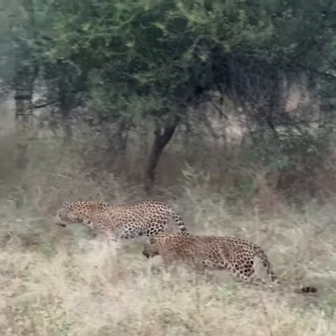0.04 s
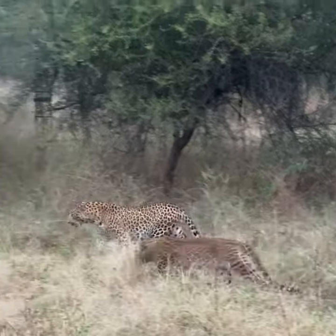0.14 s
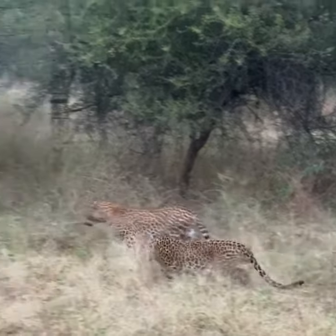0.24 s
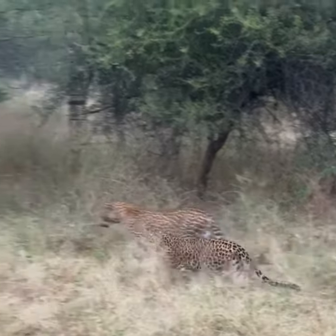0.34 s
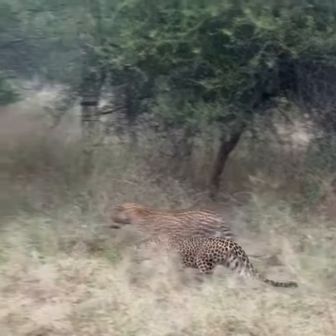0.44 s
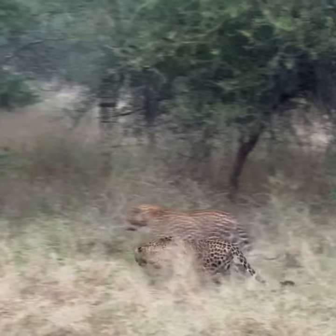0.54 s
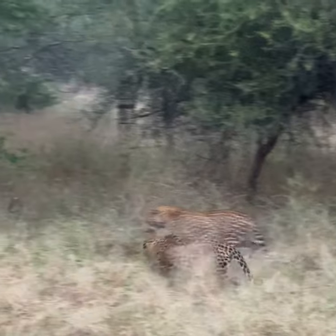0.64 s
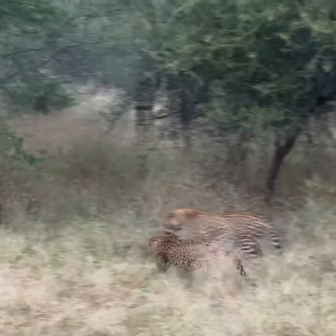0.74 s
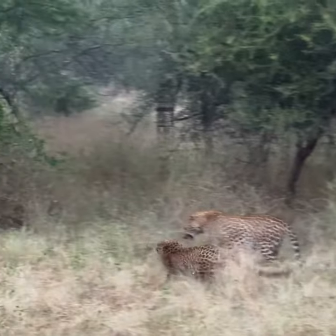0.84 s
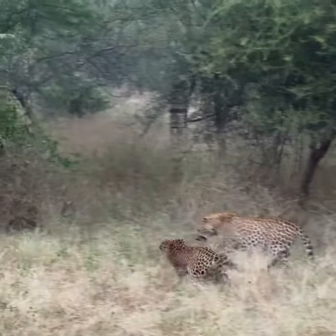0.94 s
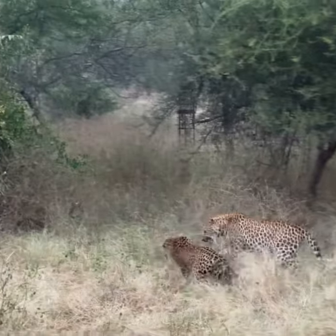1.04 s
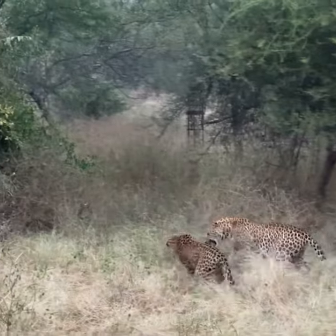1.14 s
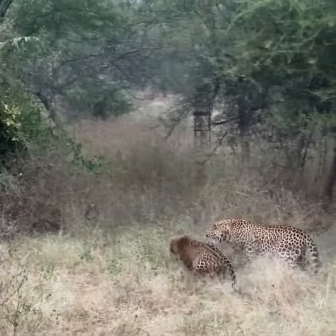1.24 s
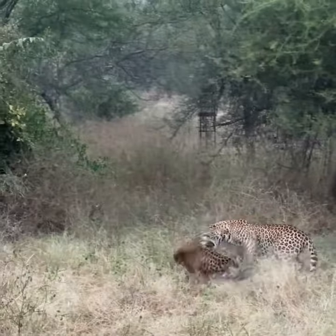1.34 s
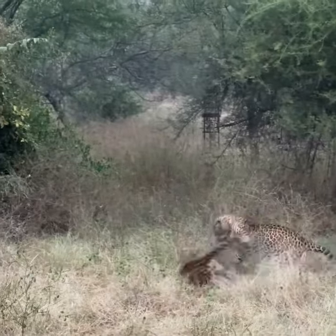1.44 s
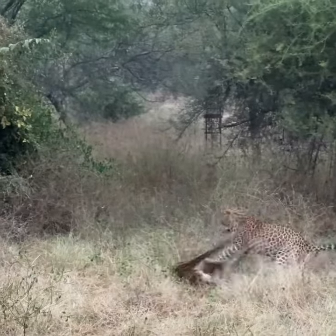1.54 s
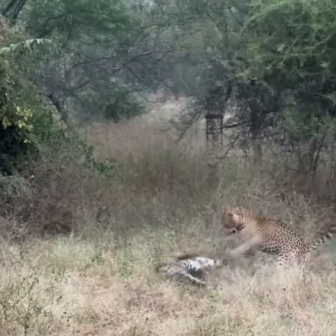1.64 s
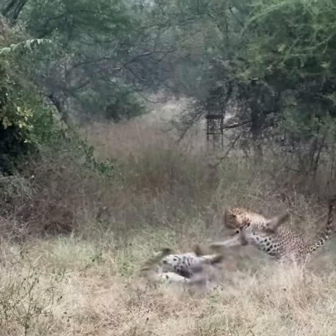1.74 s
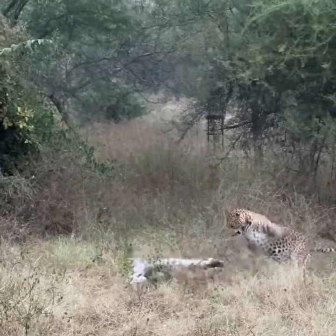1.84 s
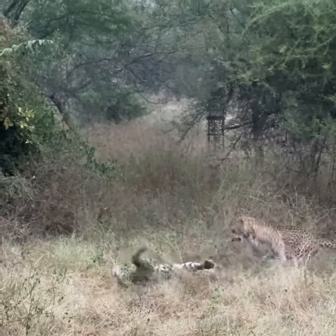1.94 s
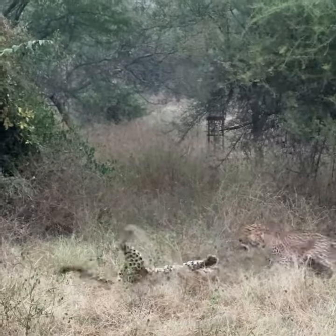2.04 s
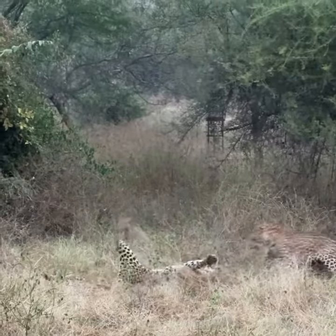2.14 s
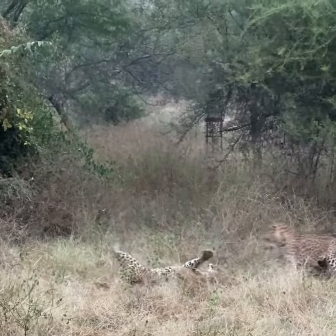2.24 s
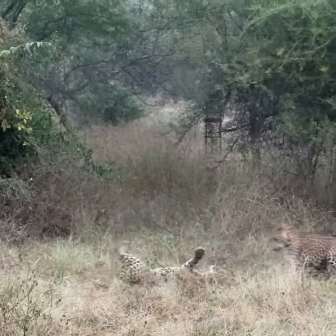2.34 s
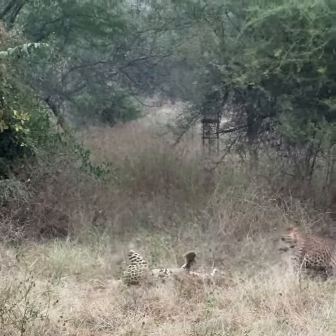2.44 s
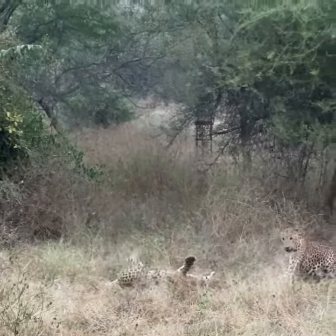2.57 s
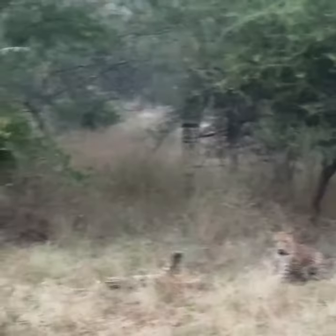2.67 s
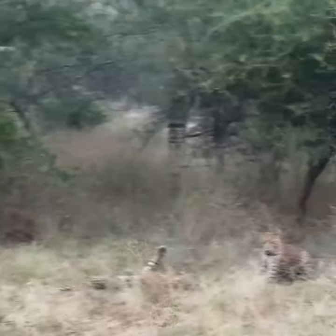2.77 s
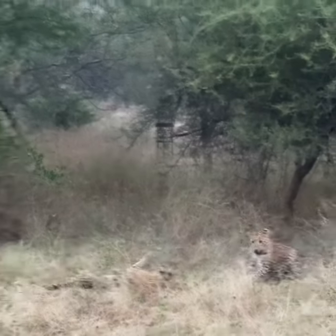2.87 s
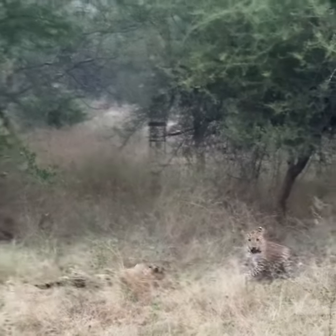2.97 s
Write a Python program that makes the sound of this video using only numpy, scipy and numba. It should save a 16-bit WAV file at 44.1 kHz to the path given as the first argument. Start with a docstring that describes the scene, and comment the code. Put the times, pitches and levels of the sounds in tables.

```python
"""Leopards scuffling in dry grass

Two leopards scuffle some way off; one is heard growling in slow throat flaps that quicken into an
open-mouthed snarl, then sink back into two weaker growls. Each flap pushes the chest resonances and
claps the throat and mouth into ringing, with turbulence on top. Shaped noise makes the breath, the
grass and the still air; clicks make the snaps and twig knocks; swept sines make two bird chirps.
"""
import sys
import numpy as np
from scipy import signal
from scipy.fft import rfft, irfft
from scipy.io import wavfile
from scipy.ndimage import uniform_filter1d
from numba import njit

SR = 44100
rng = np.random.default_rng(int(sys.argv[2]) if len(sys.argv) > 2 else 0)


def wav_record(signal):
    """Record a signal, one row per channel, as 16-bit PCM in the file named by sys.argv[1]."""
    frames = np.transpose(np.atleast_2d(signal))
    bounded = np.clip(frames, -1, 1)
    # unit amplitude maps onto the largest positive 16-bit level
    quanta = np.round(bounded * 32767).astype(np.int16)
    wavfile.write(sys.argv[1], SR, quanta)


N = 132300
TIME = np.arange(N) / SR


def from_db(db):
    """Decibels to gain."""
    return 10 ** (np.asarray(db) / 20)


def in_time(rows):
    """Draw every column of a curve out to one value per sample."""
    s, *columns = np.transpose(rows)
    return [np.interp(TIME, s, column) for column in columns]


def band(x, low_hz, high_hz, order=2):
    """Band-pass."""
    edges = [low_hz, min(high_hz, .45 * SR)]
    return signal.sosfilt(signal.butter(order, edges, "band", fs=SR, output="sos"), x + 1e-18)


def even(x):
    """Hold the slow level at rms 1, leaving single flaps standing."""
    power = uniform_filter1d(uniform_filter1d(x * x, size=2200), size=1500)
    return x / np.sqrt(np.abs(power) + 1e-16)


def clicks(times, gains):
    """One click at each time."""
    out = np.zeros(N)
    at = np.clip(np.asarray(times) * SR, 0, N - 1).astype(int)
    np.add.at(out, at, gains)
    return out


def fade(x, decay_s):
    """Each click becomes an exponentially dying envelope."""
    return signal.lfilter([1], [1, -np.exp(-1 / (decay_s * SR))], x + 1e-18)


@njit
def two_pole(x, r, w):
    """Resonator whose damping and pitch may change at every sample."""
    out, state = np.zeros(len(x)), 0j
    for i in range(len(x)):
        state = state * r[i] * complex(np.cos(w[i]), np.sin(w[i])) + (1 - r[i]) * x[i]
        out[i] = 2 * state.real
    return out


def resonate(x, hz, width_hz, order=1):
    """Resonance with gain 1 on top; at higher orders it swells before it dies."""
    damping = np.exp(-np.pi * np.abs(width_hz) / SR) * np.ones(N)
    turn = 2 * np.pi * hz / SR * np.ones(N)
    for _ in range(order):
        x = two_pole(x + 1e-18, damping, turn)
    return x


def coloured(spectrum, side_db):
    """Stereo noise of a given spectrum, its middle at rms 1."""
    hz, db = np.transpose(spectrum)
    bins_hz = np.arange(N // 2 + 1) * SR / N
    gain = from_db(np.interp(np.log(bins_hz + 1), np.log(hz), db))
    mid, side = irfft(rfft(rng.standard_normal((2, N))) * gain, N)
    return (mid + from_db(side_db) * side * np.array([[1], [-1]])) / mid.std()


# Spectrum of the still air of the bush: (frequency [Hz], relative density [dB per Hz])
AIR_SPECTRUM = [(25, 6), (60, 17), (250, 3), (500, -3.5), (2200, -20), (4000, -22.5), (14000, -63)]
AIR_DB = -51.5


def still_air():
    """Steady noise, strongest in the bass; averaging the channels makes it mono."""
    return from_db(AIR_DB) * coloured(AIR_SPECTRUM, side_db=0).mean(axis=0)


CHIRP_S, CHIRP_FALL_HZ_PER_S = .022, 55000   # bell half length to 1/e; slope on both sides of the top

# Bird chirps: (time of the top [s], top pitch [Hz], peak level [dB])
CHIRPS = [(.009, 6400, -56), (2.946, 5800, -68)]


def bird():
    """Thin whistles that rise to a top and fall again under a bell-shaped envelope."""
    out = np.zeros(N)
    for s, top_hz, db in CHIRPS:
        hz = np.maximum(top_hz - CHIRP_FALL_HZ_PER_S * np.abs(TIME - s), top_hz / 2)
        bell = np.exp(-((TIME - s) / CHIRP_S) ** 2)
        out += from_db(db) * bell * np.sin(2 * np.pi * np.cumsum(hz) / SR)
    return out


SNAP_DECAY_S, KNOCK_WIDTH_HZ = 0.0074, 35

# Dry stalks snap: (time [s], level of the envelope [dB])
SNAPS = [(0.058, -39), (1.799, -44), (1.826, -37), (2.325, -41), (2.348, -43), (2.499, -38.5),
         (2.827, -49.5)]
# Twigs knock: (time [s], pitch [Hz], peak level [dB])
KNOCKS = [(0.886, 3080, -43), (1.284, 4250, -41), (2.056, 3840, -40)]


def stalks():
    """Dry stalks snap as dying bright noise; twigs knock as struck resonances with a short ring."""
    s, db = np.transpose(SNAPS)
    bright = band(rng.standard_normal(N), 2100, 23000, order=1)
    snaps = fade(clicks(s, from_db(db)), SNAP_DECAY_S) * bright
    knocks = sum(resonate(clicks([s], from_db(db)), hz, KNOCK_WIDTH_HZ) for s, hz, db in KNOCKS)
    return snaps + knocks * SR / (2 * np.pi * KNOCK_WIDTH_HZ)   # rings start at their table level


# Bodies brush through the grass: (time [s], half length to 1/e [s], peak level [dB])
SWISHES = [(0.907, 0.062, -53), (2.546, 0.09, -48)]


def swishes():
    """Bodies brushing through grass: soft swells of band-passed noise."""
    level = sum(from_db(db) * np.exp(-((TIME - s) / half_s) ** 2) for s, half_s, db in SWISHES)
    return level * even(band(rng.standard_normal(N), 1450, 3600, order=1))


HISS_DB, HISS_FOLLOWS = -20, 0.66   # the hiss takes this share of the rasp's level in dB
HISS_SIDE_DB = -10   # stereo difference against the middle
TICKS_PER_S, TICK_WIDTH_HZ, TICK_DB = 77, 64, -8.5   # grass blades tick; level against the hiss

# Spectrum of the hiss of breath and grass: (frequency [Hz], relative density [dB per Hz])
HISS_SPECTRUM = [(2500, 6.5), (4200, -10.5), (5600, 2.5), (7000, -0.5), (8500, -1.5), (10600, 7.5),
                 (12300, -13.5), (13600, -11)]


def hiss(puff, throb=0.24, crackle=0.32, grains_per_s=200, grain_s=0.001):
    """Air through the teeth throbs with the flaps, mixed with fine crackle and ringing ticks of grass."""
    grains = fade((rng.random(N) < grains_per_s / SR) * rng.exponential(1, N), grain_s)
    shape = even(1 + throb * even(puff) + crackle * even(grains))
    # each tick is dealt one of 24 pitches
    pitches = np.geomspace(3200, 11000, 24)
    born = (rng.random(N) < TICKS_PER_S / SR) * rng.exponential(1, N)
    dealt = rng.integers(0, len(pitches), N)
    ticks = sum(resonate(born * (dealt == k), hz, TICK_WIDTH_HZ) for k, hz in enumerate(pitches))
    noise = shape * coloured(HISS_SPECTRUM, side_db=HISS_SIDE_DB)
    grass = noise + from_db(TICK_DB) * ticks / ticks.std()
    rasp_db = in_time(VOICE_LEVELS)[-1]
    return from_db(HISS_DB + HISS_FOLLOWS * rasp_db) * grass


JITTER_S, SHIMMER_DB, CLAP_SHIMMER_DB = .0004, 2.5, 3   # random spread of flap times and strengths
# the clap lags fully up to the slow rate and not at all from the fast rate on
CLAP_LAG_S, SLOW_FLAP_HZ, FAST_FLAP_HZ = .0135, 34.33, 46.26
PUFF_DECAY_S = 0.0071

# Flap rate of the vocal folds: (time [s], rate [flaps per s])
FLAP_RATE = [(0.0, 35.8), (0.06, 29.2), (0.3, 26.8), (0.58, 33.1), (0.88, 31.5), (0.98, 25.1), (1.06, 46.2),
             (1.18, 49.7), (1.37, 71.7), (1.56, 37.3), (1.64, 79.0), (1.86, 76.0), (2.0, 42.4),
             (2.07, 61.5), (2.24, 50.9), (2.46, 25.0), (2.53, 36.6), (2.65, 34.1), (2.75, 29.5)]


def folds():
    """Each flap gives a soft push, a sharp clap that comes late in slow flaps, and a puff envelope."""
    rate, = in_time(FLAP_RATE)
    at = np.flatnonzero(np.diff(np.floor(np.cumsum(rate) / SR)))   # one flap per full cycle
    chance = rng.standard_normal((len(at), 4))
    push_s = at / SR + JITTER_S * chance[:, 0]
    slowness = np.clip((FAST_FLAP_HZ - rate[at]) / (FAST_FLAP_HZ - SLOW_FLAP_HZ), 0, 1)
    clap_s = push_s + CLAP_LAG_S * slowness + JITTER_S * chance[:, 3]
    push_db = SHIMMER_DB * chance[:, 1]
    push = clicks(push_s, from_db(push_db))
    clap = clicks(clap_s, from_db(push_db + CLAP_SHIMMER_DB * chance[:, 2]))
    return push, clap, fade(clap, PUFF_DECAY_S)


def roughen(pulses, puff, puffed, steady):
    """Pulses mixed with turbulence, partly in puffs and partly steady."""
    in_puffs = even(puff * rng.standard_normal(N))
    return even(pulses) + puffed * in_puffs + steady * rng.standard_normal(N)


WAVER, WAVER_S = 0.023, .03   # spread as a share of the pitch; time between random points


def waver(hz):
    """Soft tissue never holds a resonance quite still."""
    return hz * (1 + WAVER * np.interp(TIME / WAVER_S, np.arange(N), rng.standard_normal(N)))


# trims added to the level curves
CHEST_DB, PHARYNX_DB, THROAT_DB, MOUTH_DB, RASP_DB, RUMBLE_DB = 0.5, -3, -4.5, -0.5, -1, 1
# resonance widths with the mouth shut, and the extra width at full gape
CHEST_WIDTH_HZ, PHARYNX_WIDTH_HZ, THROAT_WIDTH_HZ, MOUTH_WIDTH_HZ = 165, 127, 48, 38
CHEST_GAPE_HZ, PHARYNX_GAPE_HZ, THROAT_GAPE_HZ, MOUTH_GAPE_HZ = 150, 232, 236, 182
BODY_HZ, BODY_WIDTH_HZ, BODY_DB = 124.7, 75, -7   # a low chest resonance that stays put
RUMBLE_HZ, RUMBLE_WIDTH_HZ = 64.2, 31
# turbulence against the pulses, before gaping adds more
PUSH_PUFFED, PUSH_STEADY, CLAP_PUFFED, CLAP_STEADY, RASP_PUFFED = .25, .2, .45, .12, 1.9

# Voice levels before the trims; the hiss follows the rasp too:
# (time [s], chest [dB], low throat [dB], mouth [dB], rasp [dB])
VOICE_LEVELS = [(0.035, -47, -85, -75, -64), (0.09, -77, -77, -73, -66.5), (0.2, -40, -74, -68, -68),
                (0.45, -35, -57, -67.5, -64), (0.6, -37, -66, -64.5, -59), (0.655, -33, -48, -57.5, -64),
                (0.92, -33, -54.5, -61.5, -59), (1.005, -47, -62.5, -78, -56),
                (1.04, -34.5, -51.5, -55, -54.5), (1.2, -31, -41, -47.5, -48.5),
                (1.3, -31.5, -45.5, -48, -48), (1.38, -23.5, -36.5, -33, -42),
                (1.46, -26.5, -37.5, -36.5, -42.5), (1.52, -36.5, -51.5, -55, -51.5),
                (1.61, -33, -56, -51, -57), (1.64, -27.5, -37.5, -24.5, -46.5),
                (1.685, -25.5, -38, -34, -40.5), (1.715, -33, -45, -44.5, -43.5),
                (1.75, -27, -39, -37.5, -42), (1.84, -25.5, -38.5, -33, -39.5),
                (1.95, -26.5, -49, -40.5, -39.5), (2.0, -29.5, -47, -49, -52), (2.12, -26, -40, -37, -38.5),
                (2.3, -30, -47, -46, -49.5), (2.41, -31, -56.5, -58, -57), (2.455, -49.5, -61, -66, -55.5),
                (2.52, -31, -49, -51.5, -52), (2.68, -28, -45.5, -55.5, -50), (2.82, -50, -78, -84, -77),
                (2.88, -57, -100, -72, -77), (2.98, -42.5, -88, -77, -76)]
# Deep rumble under the growl, before its trim: (time [s], level [dB])
RUMBLE_LEVEL = [(.1, -54.5), (.33, -43), (.9, -36.5), (1.06, -49), (1.2, -50), (1.44, -33), (1.6, -48),
                (2.15, -43), (2.47, -40.5), (2.6, -35), (2.87, -53.5)]
# Resonances as the jaw opens and closes, before they waver:
# (time [s], chest [Hz], throat [Hz], mouth [Hz])
JAW = [(.5, 195, 920, 1360), (.65, 160, 724, 1232), (.95, 144, 770, 1192), (1.08, 137, 898, 1348),
       (1.45, 162, 850, 1347), (1.59, 152, 750, 1230), (1.635, 444, 820, 1240), (1.71, 288, 770, 1410),
       (1.83, 288, 740, 1360), (1.93, 258, 750, 1226), (2.0, 165, 820, 1426), (2.13, 175, 946, 1530),
       (2.42, 150, 840, 1318), (2.52, 164, 750, 1204),]
# Resonance at the back of the throat, before it wavers: (time [s], frequency [Hz])
PHARYNX = [(.95, 358), (1.1, 467), (1.34, 496), (1.39, 344), (1.5, 357), (1.65, 570), (1.86, 620),
           (2.3, 485), (2.55, 335)]
# How wide the mouth gapes: (time [s], gape [share 0-1])
GAPE = [(1.2, 0.11), (1.45, 0.22), (1.58, 0.4), (1.64, 0.9), (1.9, 0.8), (2.02, 0.04), (2.12, 0.63),
        (2.4, 0.02)]
# Upper resonances of the mouth: (frequency [Hz], width [Hz], relative level [dB])
RASP_MODES = [(1940, 480, 14), (2360, 1300, -1.5), (3340, 390, -18.5), (4550, 430, -9.5)]


def growl(push, clap, puff):
    """Pushes swell in the chest, claps ring throat and mouth; gaping widens and changes the turbulence."""
    chest_db, throat_db, mouth_db, rasp_db = in_time(VOICE_LEVELS)
    rumble_db, = in_time(RUMBLE_LEVEL)
    chest_hz, throat_hz, mouth_hz, pharynx_hz = [waver(hz) for hz in in_time(JAW) + in_time(PHARYNX)]
    gape = np.clip(in_time(GAPE)[0], 0, 1)

    drive = roughen(push, puff, puffed=PUSH_PUFFED + 0.51 * gape, steady=PUSH_STEADY + 0.34 * gape)
    chest = even(resonate(drive, chest_hz, CHEST_WIDTH_HZ + CHEST_GAPE_HZ * gape, order=4))
    chest += from_db(BODY_DB) * even(resonate(drive, BODY_HZ, BODY_WIDTH_HZ, order=2))
    rumble = resonate(drive, RUMBLE_HZ, RUMBLE_WIDTH_HZ, order=2)

    drive = roughen(clap, puff, puffed=CLAP_PUFFED + 2.0 * gape, steady=CLAP_STEADY + 0.64 * gape)
    pharynx = resonate(drive, pharynx_hz, PHARYNX_WIDTH_HZ + PHARYNX_GAPE_HZ * gape, order=2)
    throat = resonate(drive, throat_hz, THROAT_WIDTH_HZ + THROAT_GAPE_HZ * gape)
    mouth = resonate(drive, mouth_hz, MOUTH_WIDTH_HZ + MOUTH_GAPE_HZ * gape)
    mouth = resonate(mouth, mouth_hz, 720)   # a broad second pass trims its skirts

    drive = roughen(clap, puff, puffed=RASP_PUFFED, steady=1.5 - gape)
    rasp = np.zeros(N)
    for k, (hz, width_hz, db) in enumerate(RASP_MODES):
        rasp += (-1) ** k * from_db(db) * resonate(drive, hz, width_hz)   # neighbours in opposite sign

    # the pharynx level lies 30 % of the way from throat to chest
    pharynx_db = throat_db + .3 * (chest_db - throat_db)
    return (from_db(CHEST_DB + chest_db) * even(band(chest, 86, 600))
            + from_db(PHARYNX_DB + pharynx_db) * even(band(pharynx, 217, 1050))
            - from_db(THROAT_DB + throat_db) * even(band(throat, 390, 1100))
            + from_db(MOUTH_DB + mouth_db) * even(mouth)
            + from_db(RASP_DB + rasp_db) * even(band(rasp, 1840, 5400))
            + from_db(RUMBLE_DB + rumble_db) * even(band(rumble, 44, 150)))


SCATTER_DB, SCATTER_T60_S = -5, 0.15


def scatter(x):
    """A short tail thrown back by bushes and trees, without the deep bass: dying noise as an echo."""
    t = TIME[:SR // 2]
    tail = rng.standard_normal(len(t)) * from_db(-60 * t / SCATTER_T60_S)
    tail /= np.linalg.norm(tail)
    return from_db(SCATTER_DB) * signal.fftconvolve(band(x, 221, 6700), tail)[:N]


SNARL_PAN_DB = -2.5   # gain of left against right


def lean(voice):
    """What to add to each channel so that the middle of the voice leans a little to the right."""
    gains = from_db(SNARL_PAN_DB * np.array([[.5], [-.5]]))
    return (gains - 1) * band(voice, 500, 840, order=1)


def scene():
    """The voice is nearly straight ahead, amid grass hiss, swishes, snaps, chirps and still air."""
    push, clap, puff = folds()
    voice = growl(push, clap, puff)
    voice = voice + scatter(voice)
    return voice + lean(voice) + hiss(puff) + swishes() + stalks() + bird() + still_air()


LOW_CUT_HZ, CUTOFF_HZ = 42, 13000

# Bands in which the right channel turns in phase against the left: (centre [Hz], width [Hz])
PHASE_TURNS = [(4950, 560), (9000, 2360)]


def record(dry):
    """All-pass filters turn the right channel's phase in treble bands; lowest bass and top are cut."""
    left, right = signal.sosfilt(signal.butter(4, LOW_CUT_HZ, "high", fs=SR, output="sos"), dry)
    for hz, width_hz in PHASE_TURNS:
        notched = signal.lfilter(*signal.iirnotch(hz, hz / width_hz, fs=SR), right)
        right = 2 * notched - right   # all-pass: same level, turned phase
    top_cut = signal.ellip(10, .1, 80, CUTOFF_HZ, fs=SR, output="sos")
    return signal.sosfilt(top_cut, np.array([left, right]))


dry = scene()
out = record(dry)
wav_record(out)
```